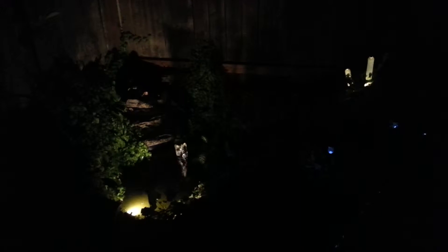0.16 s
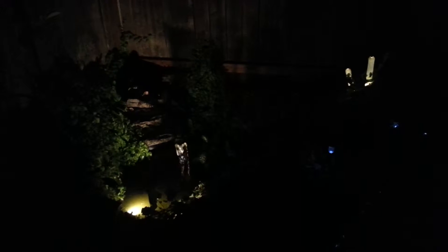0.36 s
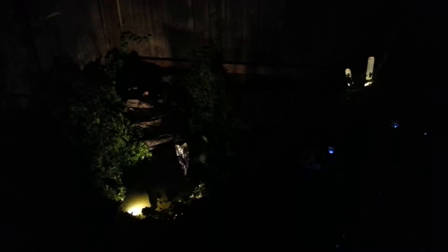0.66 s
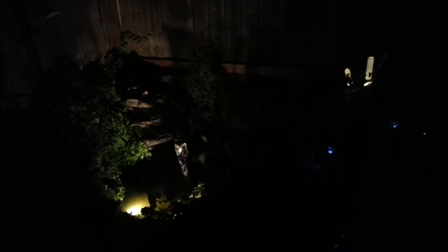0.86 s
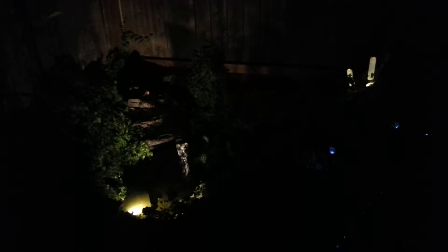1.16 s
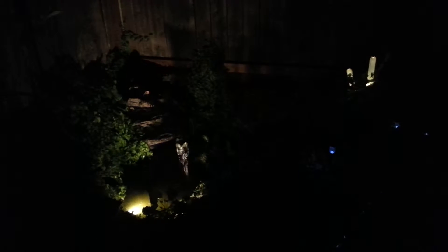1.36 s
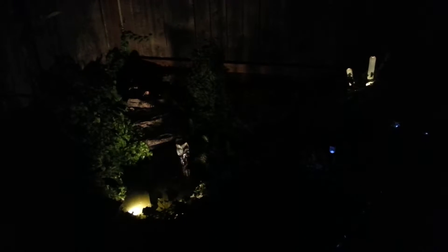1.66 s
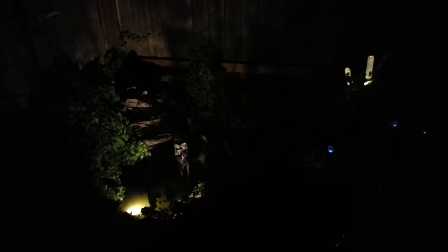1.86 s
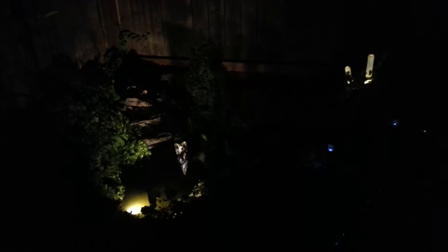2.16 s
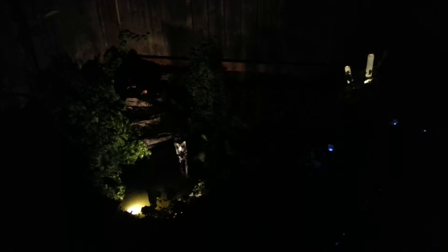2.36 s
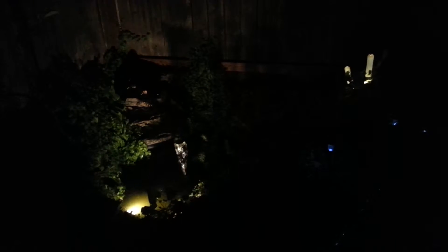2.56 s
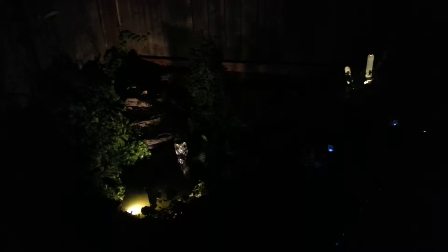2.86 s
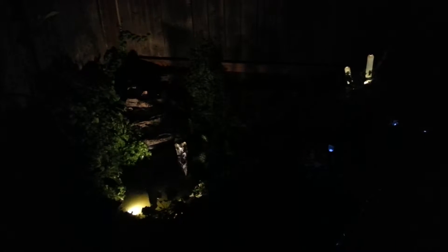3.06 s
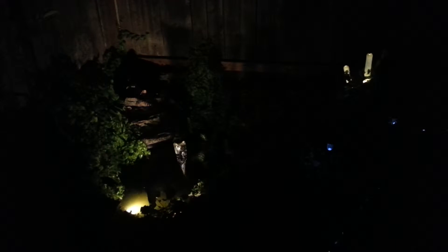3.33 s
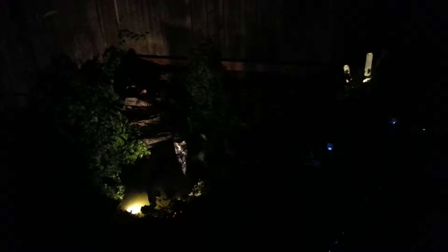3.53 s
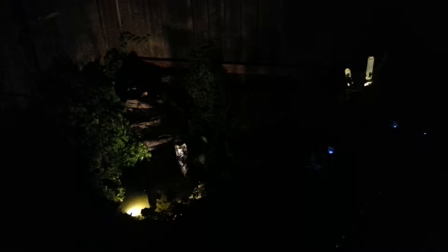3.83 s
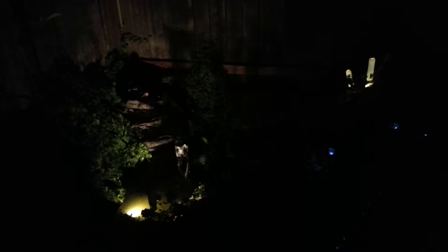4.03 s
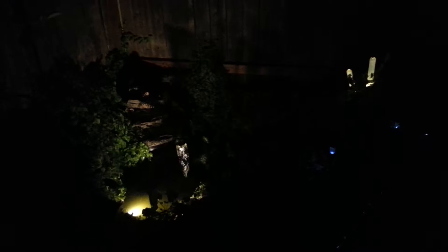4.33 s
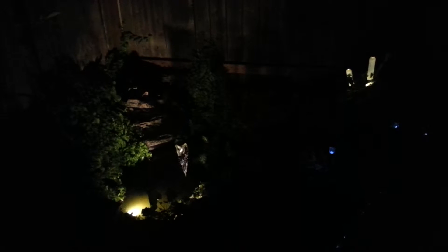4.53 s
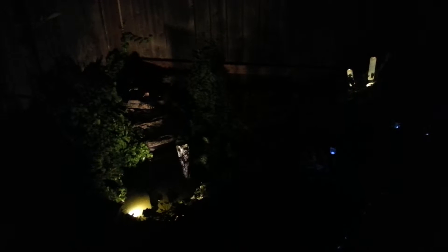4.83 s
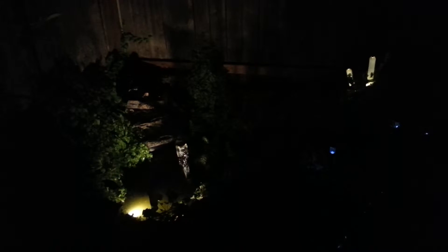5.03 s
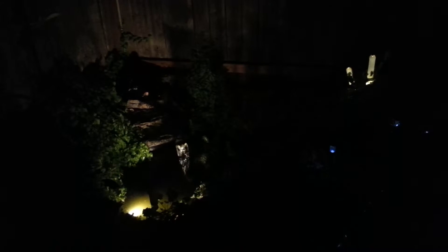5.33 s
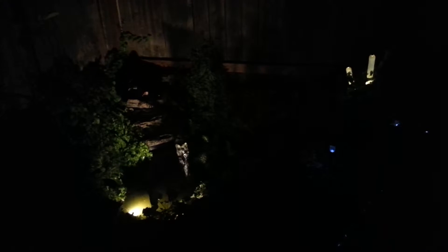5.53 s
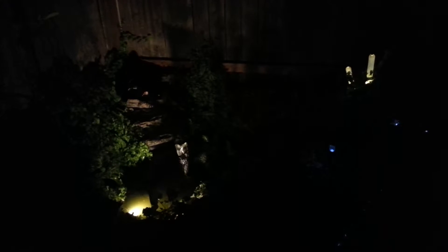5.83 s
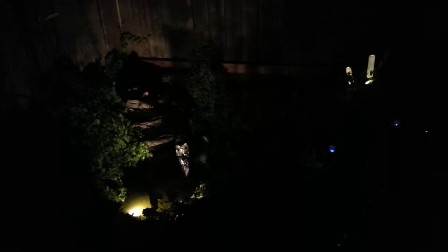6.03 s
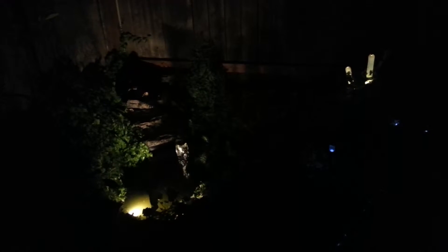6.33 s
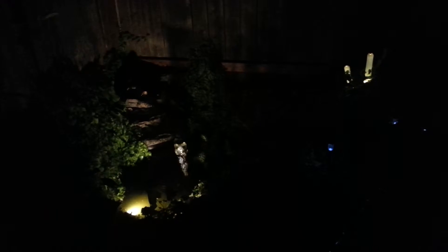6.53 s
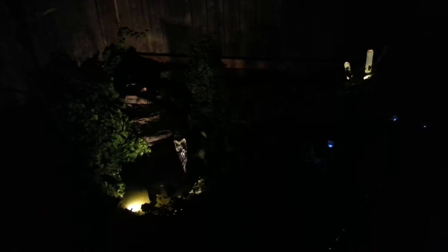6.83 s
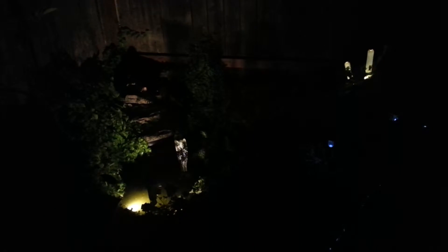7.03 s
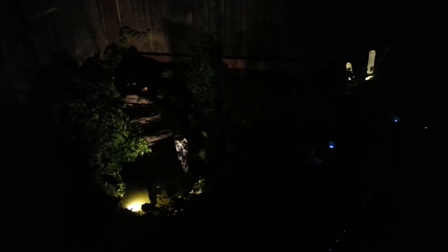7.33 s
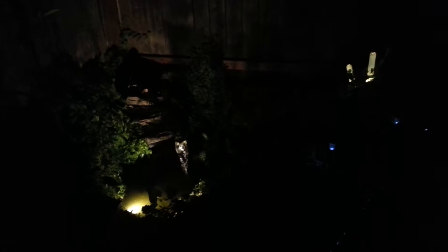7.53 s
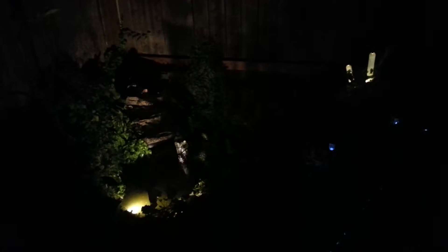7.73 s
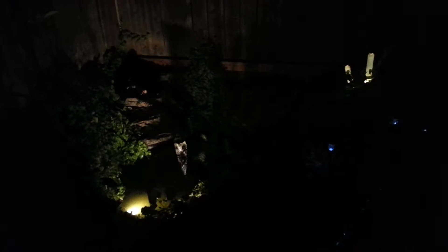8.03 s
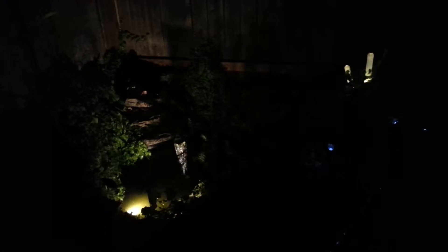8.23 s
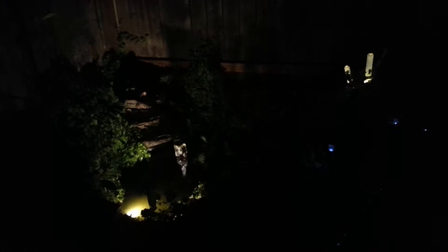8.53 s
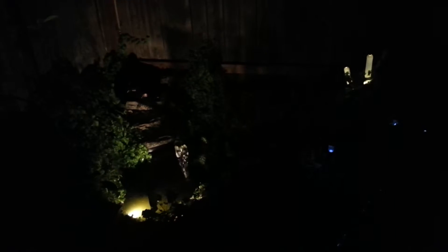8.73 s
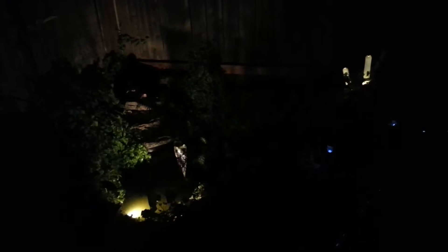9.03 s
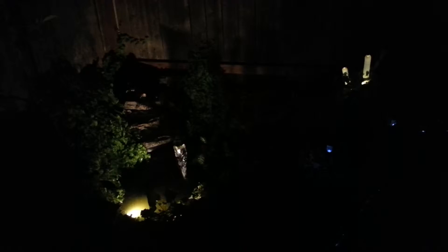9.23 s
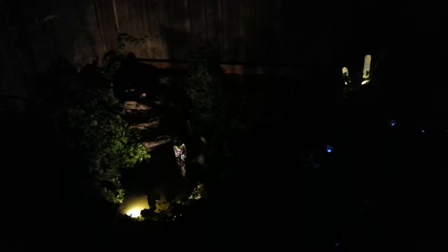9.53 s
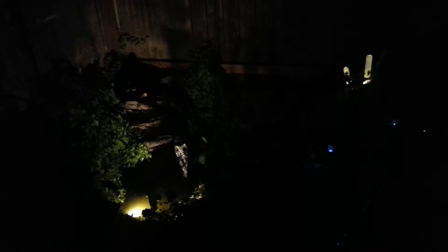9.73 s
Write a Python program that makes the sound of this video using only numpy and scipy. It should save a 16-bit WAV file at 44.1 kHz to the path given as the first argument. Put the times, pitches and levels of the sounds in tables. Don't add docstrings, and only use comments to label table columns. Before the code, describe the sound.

Seven brief, rapidly pulsed frog chirrs ring out over the hiss, drips and bubbly plops of a little backyard fountain in the dark.

```python
import sys
import numpy as np
from scipy import signal
from scipy.io import wavfile
from scipy.ndimage import uniform_filter1d, minimum_filter1d

SR = 44100
rng = np.random.default_rng(int(sys.argv[2]) if len(sys.argv) > 2 else 0)


def invert_db(x):
    u = np.asarray(x, float) / 20
    return 10 ** u


def generate_wav(sig):
    pcm = np.round(np.clip(np.atleast_2d(sig).T, -1, 1) * 32767).astype(np.int16)
    wavfile.write(sys.argv[1], SR, pcm)


N = 436149

# frequency in Hz, level in dB.
BASIN_MODES = [(1040, 3.5), (1280, 3.5), (1610, 5), (1800, 0.5), (2100, 2), (2440, 2), (2750, -4),
               (3770, -24), (4080, -13)]
# start in seconds, peak in dB, pitch in Hz, spray in dB re the peak.
DEEP_PLOPS = [(0.3538, -25, 2400, -15), (0.544, -24, 2690, -18), (1.056, -22.5, 1790, -24),
              (1.1782, -23, 2400, -24), (1.2757, -17.5, 2560, -23), (1.9599, -18.5, 2430, -29),
              (2.0263, -21.5, 3070, -26), (2.2518, -21, 1980, -38), (2.8935, -22.5, 2260, -22),
              (3.01, -25, 2570, -24), (3.955, -26, 2420, -11), (4.0136, -23.5, 1830, -21),
              (4.1584, -23, 2210, -19), (4.8873, -24, 1040, -15), (5.0105, -25.5, 2260, -11),
              (5.7029, -33, 2120, -15), (5.8796, -21, 2260, -28), (5.9529, -27, 1400, -16),
              (6.1744, -22.5, 1800, -26), (6.6573, -20, 2140, -17), (6.9706, -26, 2120, -20),
              (7.1023, -26, 1770, -13), (7.209, -22.5, 2123, -35), (7.8325, -23.5, 2035, -20),
              (8.1744, -27, 2160, -24), (8.1963, -21.5, 2740, -27), (8.5203, -21, 2580, -26),
              (8.673, -19, 2640, -30), (9.019, -19.5, 2930, -22), (9.2344, -27.5, 2300, -11)]
# start in seconds, peak in dB, pitch in Hz, spray in dB re the peak.
STONE_DROPS = [(0.4544, -23, 5500, -18), (0.7175, -20.5, 4900, -17), (0.822, -15, 3950, -28),
               (1.101, -18, 4000, -18), (1.2253, -17.5, 4070, -22), (1.3698, -29.5, 4900, -10),
               (1.7577, -19.5, 5260, -19), (1.9094, -17.5, 4700, -16.5), (2.637, -19.5, 4640, -39),
               (2.7028, -17, 4730, -33.5), (2.8315, -20, 4150, -29.5), (3.491, -24, 4500, -33),
               (3.536, -23, 3910, -10.5), (3.847, -18.5, 3770, -18), (3.9037, -17.5, 4050, -16),
               (4.614, -22.5, 4850, -16), (5.419, -21.5, 4000, -20), (5.4983, -24, 5270, -33),
               (5.5407, -20, 4370, -19.5), (5.7821, -20, 3700, -31), (5.8587, -20.5, 4170, -24),
               (6.061, -19.5, 4050, -32), (6.2184, -16.5, 4560, -26), (6.8503, -22, 6070, -21.5),
               (7.0454, -25, 4960, -49), (7.9946, -26.5, 5040, -17), (8.547, -27, 4940, -25.5),
               (9.1661, -18, 3930, -33), (9.508, -18, 3820, -21), (9.7213, -19.5, 5640, -27)]


def rms_one(x):
    return x / np.sqrt(np.mean(x ** 2) + 1e-20)


def in_time(rows):
    s, *columns = np.transpose(rows)
    return [np.interp(np.arange(N) / SR, s, c) for c in columns]


def at_hz(points, hz):
    table_hz, db = np.transpose(points)
    return np.interp(np.log(hz), np.log(table_hz), db)


def hz_between(low_hz, high_hz, count):
    return low_hz * (high_hz / low_hz) ** rng.random(count)


def band_noise(low_hz, high_hz, white):
    sos = signal.butter(2, [low_hz, high_hz], "band", fs=SR, output="sos")
    return rms_one(signal.sosfilt(sos, white))


def drift(rate):
    step = 40
    r = np.exp(-2 * step * np.pi * rate / SR)
    white = rng.standard_normal(N // step + 2002)
    slow = signal.lfilter([1], [1, -2 * r, r * r], white)[2000:]
    return np.interp(np.arange(N) / step, np.arange(len(slow)), rms_one(slow))


def resonate(x, hz, width_hz):
    r = np.exp(-np.pi * width_hz / SR)
    zeros = np.array([1, 0, -1]) * (1 - r * r) / 2
    poles = [1, -2 * r * np.cos(2 * np.pi * hz / SR), r * r]
    return signal.lfilter(zeros, poles, x + 1e-18)


def add(track, s, piece):
    i = int(round(s * SR))
    track[max(i, 0):max(i + len(piece), 0)] += piece[max(-i, 0):max(len(track) - i, 0)]


def pulse(hz, sweep, rise_s):
    t = np.arange(700) / SR
    shape = t / rise_s * np.exp(1 - t / rise_s)
    glide = 1 + sweep * (t / rise_s / 2 - 1)
    return shape * np.sin(2 * np.pi * hz * t * glide)


def puff(rise_s):
    t = np.arange(200) / SR
    burst = t / rise_s * np.exp(1 - t / rise_s) * rng.standard_normal(len(t))
    burst[int(rise_s * SR)] += 7 * np.sqrt(np.mean(burst ** 2) * 10)
    return burst / np.sqrt(np.sum(burst ** 2))


def closing_tone(length_s, hz):
    t = np.arange(int(length_s * SR)) / SR
    shape = np.clip(t / 0.012, 0, 1) * np.clip((length_s - t) / 0.0046, 0, 1)
    partials_db = (-3.0, 0, -17.0)
    return shape * sum(invert_db(db) * np.sin(2 * np.pi * hz * k * t) for k, db in enumerate(partials_db, start=1))


def perch_hollows(clicks):
    # frequency in Hz, bandwidth in Hz, level in dB.
    hollows = [(997, 81, -12), (1490, 166, -4.5), (1690, 98, -13.5), (1905, 37, -9), (2260, 34, -8.5),
               (2650, 51, -6.5), (3040, 270, -7.5), (3113, 33, -2.5), (3678, 62, -15.5), (3810, 183, -14.5),
               (4600, 80, -26), (4780, 140, -23.5)]
    dull = signal.sosfilt(signal.butter(1, 9000, fs=SR, output="sos"), clicks)
    out = np.zeros(N)
    for k, (hz, width_hz, db) in enumerate(hollows):
        out += (-1) ** k * invert_db(db) * SR / width_hz * resonate(dull, hz, width_hz)
    return out


def frog():
    # first pulse in seconds, pulses per second, change of that rate per second.
    trains = [(.0012, 109.5, 12), (1.4204, 112, -16), (2.3013, 112, -20), (3.5884, 117.5, -80),
              (4.3366, 111.5, -24), (5.046, 114, -60), (7.4539, 115, -52)]
    # last pulse in seconds, end of the closing note in seconds, pitch in Hz, level in dB.
    closings = [(0.182, 0.198, 1244, -25), (1.611, 1.625, 1352, -15), (2.482, 2.496, 1308, -16.5),
                (3.768, 3.787, 1289, -23.5), (4.522, 4.534, 1315, -12.5), (5.221, 5.235, 1258, -22.5),
                (7.633, 7.646, 1320, -15.5)]
    # share of the train 0-1, sac tone in dB, upper band in dB, mouth resonance in Hz.
    call_shape = [(0.0, -33, -26.5, 2250), (0.1, -21, -14.5, 2300), (0.3, -14.5, -12, 2570),
                  (0.52, -24, -14, 2674), (0.8, -18.5, -13, 2780), (1.0, -23.5, -17.5, 2593)]
    strengths = [0.1, -0.66, 0.013, 0.55, -0.23, -0.13, 0.32]
    sac_hz = 1190.4
    weak_start_db, fill_s = -5.0, .07
    low, mouth, clicks = np.zeros((3, N))
    share, sac_db, upper_db, upper_hz = np.transpose(call_shape)
    for call_db, train, closing in zip(strengths, trains, closings):
        first_s, per_s, change = train
        last_s, end_s, close_hz, close_db = closing
        s = first_s + share * (last_s - first_s)
        at = first_s
        for early, sac, upper, bend in np.clip(rng.standard_normal((32, 4)), -1.8, 1.8):
            if at < last_s:
                start = at - .0015 + .00008 * early
                sac_level = invert_db(call_db + np.interp(at, s, sac_db) + 2.0 * sac)
                add(low, start, sac_level * pulse(sac_hz * (1 + 0.0069 * bend), 0.015, 0.0018))
                loud = invert_db(call_db + np.interp(at, s, upper_db) + 1.6 * upper)
                mouth_hz = np.interp(at, s, upper_hz) * (1 + .012 * bend)
                add(mouth, start, loud * pulse(mouth_hz, .05, .0012))
                filling = invert_db(weak_start_db * max(0, 1 - (at - first_s) / fill_s))
                add(clicks, start, loud * filling * puff(.0004))
            at += 1 / (per_s + change * (at - first_s))
        add(mouth, last_s + 0.002985, invert_db(close_db) * closing_tone(end_s - last_s, close_hz))
    sac_ring = resonate(low, sac_hz, 44)
    return invert_db(-11.0) * low + invert_db(6.0) * sac_ring + invert_db(4.0) * mouth + invert_db(-13.0) * perch_hollows(clicks)


def yard(x):
    # delay in seconds, level in dB.
    echoes = [(.0024, -6), (.0052, -7), (.0118, -12), (.0163, -15), (.023, -18)]
    # frequency in Hz, bandwidth in Hz, level in dB.
    tail_bands = [(1255, 130, 6), (2610, 170, -1)]
    t60_s, tail_db = 0.39, -5 - 37.5
    t = np.arange(SR // 2) / SR
    tail = invert_db(tail_db - 60 * t / t60_s) * rng.standard_normal(len(t)) * np.clip(t / 0.0083, 0, 1)
    response = invert_db(-9.0) * tail
    for hz, width_hz, db in tail_bands:
        response += invert_db(db) * resonate(tail, hz, width_hz)
    response[0] = 1
    for k, (delay_s, db) in enumerate(echoes):
        response[int(delay_s * SR)] += (-1) ** k * invert_db(db)
    return signal.fftconvolve(x, response)[:N]


def spatter(flow_db, per_s=220, spread_db=-4.5, bed_db=-6.5):
    # frequency in Hz, spectral level in dB.
    water_spectrum = [(500, -12), (800, -6.5), (1100, -8), (1500, -8), (2100, -5), (3200, -7), (4200, -7),
                      (5300, -5), (6000, -20), (6800, -17), (10000, -19), (13400, -20), (15000, -28)]
    splash_db, splash_fall_db_per_oct = -11.5, 13
    out, white = np.zeros(N), rng.standard_normal((2, N))
    edges = np.geomspace(550, 15000, num=22)
    lands = np.flatnonzero(rng.random(N) < per_s / SR)
    size_db = spread_db * np.minimum(rng.exponential(1, len(lands)), 2.5)
    centre_oct = np.log2(hz_between(825, 18600, len(lands)))
    s, peak_db, pitch_hz, spray_db = np.transpose(DEEP_PLOPS + STONE_DROPS)
    loud_at = (s * SR).astype(int)

    def die_away(hits, fade):
        decay = signal.lfilter([1], [1, -fade], hits + 1e-18)
        return signal.lfilter([.02], [1, -.98], decay)

    for k, (low, high) in enumerate(zip(edges, edges[1:])):
        hz = np.sqrt(low * high)
        noise = band_noise(low, high, white[k % 2])
        fade = invert_db(-60 / (SR * 0.06 * (hz / 3000) ** -.2))
        small, loud = np.zeros(N), np.zeros(N)
        small[lands] = invert_db(size_db - 99 * (np.log2(hz) - centre_oct) ** 2)
        if hz < 6000:
            burst_db = splash_db - splash_fall_db_per_oct * np.abs(np.log2(hz / pitch_hz))
        else:
            burst_db = spray_db - 11.7 * np.log2(hz / 6000)
        loud[loud_at] = invert_db(peak_db + burst_db)
        small = rms_one(die_away(small, fade))
        loud = die_away(loud, fade)
        sheet = invert_db(bed_db + 1.5 * drift(15.0))
        level = invert_db(flow_db + at_hz(water_spectrum, hz) + 10 * np.log10(high - low) - 29.5)
        drops = invert_db(-10.0 - 1.9 * (hz > 6500) - 5.0 * (hz < 1400))
        out += noise * np.sqrt(level ** 2 * (sheet ** 2 + drops * small ** 2) + loud ** 2)
    return out


def basin(x, ring_db=-9.0):
    return x + sum(invert_db(ring_db + db) * resonate(x, hz, .03 * hz) for hz, db in BASIN_MODES)


def bubble(hz, cycles, rise):
    t = np.arange(1500) / SR
    age = t * hz / cycles
    return np.clip(t / .0012, 0, 1) * invert_db(-60 * age) * np.sin(2 * np.pi * hz * t * (1 + rise * age))


def bubbles(count=700):
    out = np.zeros(N)
    for when, which, size, bend in rng.random((count, 4)):
        hz, db = BASIN_MODES[int(which * len(BASIN_MODES))]
        level = invert_db(db - 40 - 2.5 * np.log(size + .1))
        add(out, when * N / SR, level * bubble(hz * (.94 + .12 * bend), 55, .04))
    for s, peak_db, hz, _ in DEEP_PLOPS + STONE_DROPS:
        level = invert_db(peak_db - 5.5 + 2 * np.log2(hz / 3000))
        add(out, s, level * bubble(hz, 84, 0.0069))
    return out


def traffic():
    # time in seconds, level in dB.
    swells = [(0.0, -39.5), (0.61, -41), (0.96, -36), (1.29, -42), (1.98, -36.5), (2.73, -41.5),
              (3.61, -35.5), (3.94, -42.5), (4.46, -40.5), (4.71, -39), (5.4, -42), (5.81, -39),
              (6.25, -42.5), (7.77, -35.5), (8.37, -42), (8.95, -39), (9.28, -42.5), (9.89, -37.5)]
    # frequency in Hz, bandwidth in Hz, level in dB.
    rumble_bands = [(116, 26, 0), (183, 14, -3), (270, 54, 1.5), (364.3, 13.3, -4), (447.4, 14.3, -9),
                    (503, 43, -16)]
    upper_db, = in_time(swells)
    deep_db = -42.0 + .6 * (upper_db - upper_db.mean())
    out = invert_db(upper_db - 2.5) * band_noise(85, 650, rng.standard_normal(N))
    for hz, width_hz, db in rumble_bands:
        band = rms_one(resonate(rng.standard_normal(N), hz, width_hz))
        swell_db = deep_db if hz < 230 else upper_db
        out += invert_db(swell_db + db - 3.0 + 0.83 * drift(3.45)) * band
    return out


def scene():
    # time in seconds, water level in dB.
    flow = [(0.0, -38.5), (1.5, -39), (2.6, -38), (4.0, -38.5), (5.5, -39), (7.3, -38), (8.5, -38.5),
            (9.89, -39.5)]
    flow_db, = in_time(flow)
    water = basin(spatter(flow_db + 4.0)) + bubbles()
    return (invert_db(2.0) * yard(frog()) + water + traffic())[None]


def starved_treble(x, loud_share=.62, patchy_db=5.0):
    # frequency in Hz, limit in dB over the usual line level.
    drop_limit = [(3500, -40), (5500, -16), (7500, -9), (9600, -2.5), (11000, 2), (12500, 4), (14000, 6),
                  (14600, 9), (14900, 60)]
    window = np.sqrt(np.hanning(2049)[:2048])
    hz, s, lines = signal.stft(x, SR, window, nperseg=2048, noverlap=1024)
    size = np.abs(lines)
    usual = uniform_filter1d(np.median(size, axis=1), size=15)[:, None]
    loud_db = 10 * np.log10(np.sum(size ** 2, axis=0) + 1e-12)
    patches = np.repeat(rng.standard_normal((103, len(s))), 10, axis=0)[:len(hz)]
    limit_db = at_hz(drop_limit, hz + 1)[:, None] + patchy_db * patches
    limit_db = limit_db + loud_share * (loud_db - np.median(loud_db))
    kept = lines * (size > usual * invert_db(limit_db))
    return signal.istft(kept, SR, window, nperseg=2048, noverlap=1024)[1][:N]


def top_cut(x):
    return signal.sosfilt(signal.butter(12, 15700, fs=SR, output="sos"), x)


def record(dry):
    x = signal.sosfilt(signal.butter(2, 75, "high", fs=SR, output="sos"), dry[0])
    room_left = np.minimum(1, .99 / (np.abs(x) + 1e-9))
    x = x * uniform_filter1d(minimum_filter1d(room_left, size=89), size=89)
    return top_cut(starved_treble(x)[None])


dry = scene()
out = record(dry)
generate_wav(out)
```